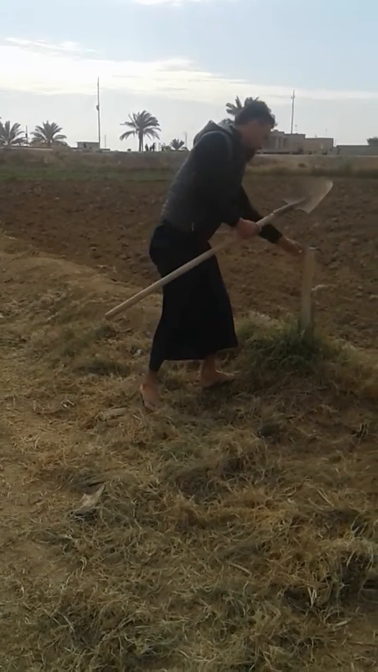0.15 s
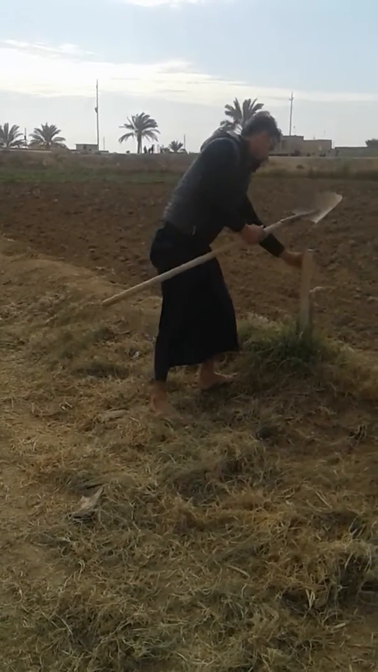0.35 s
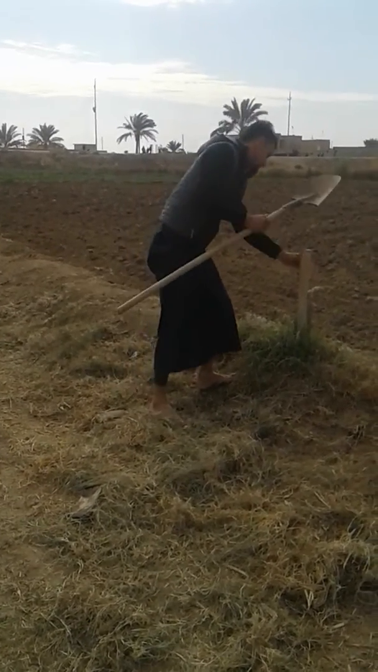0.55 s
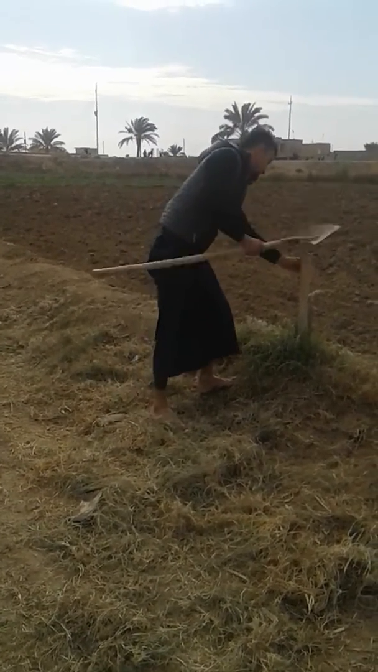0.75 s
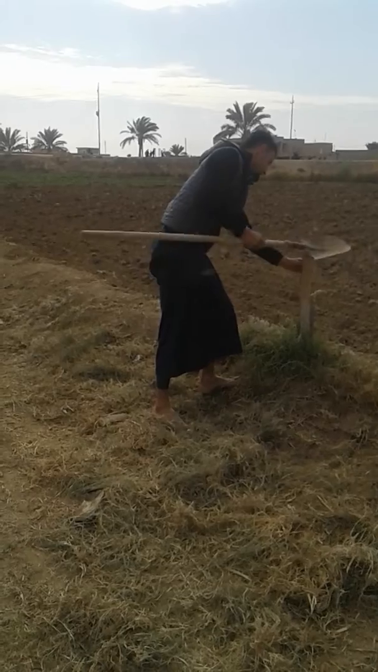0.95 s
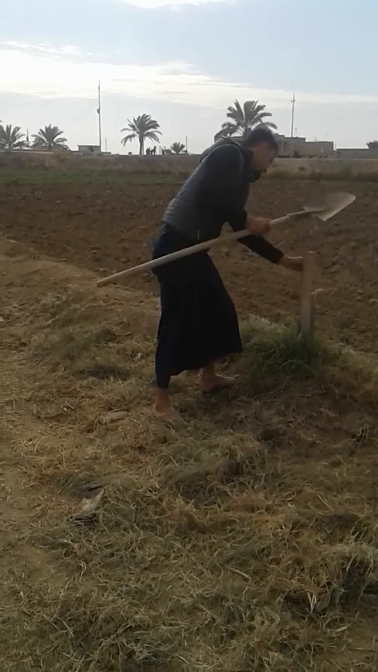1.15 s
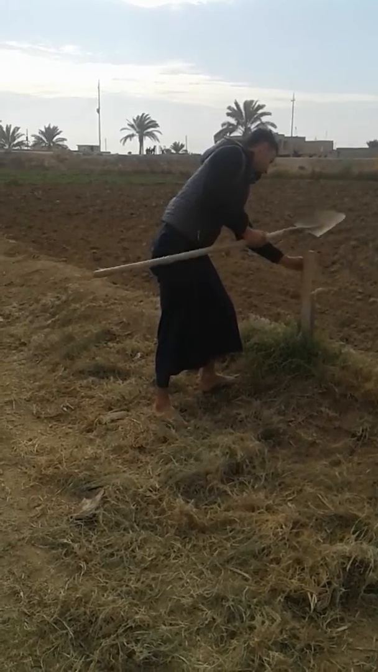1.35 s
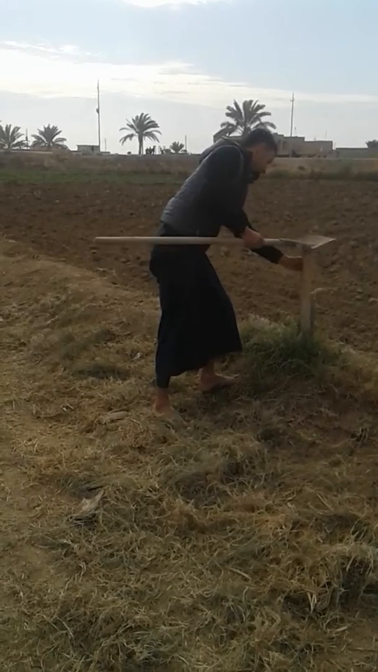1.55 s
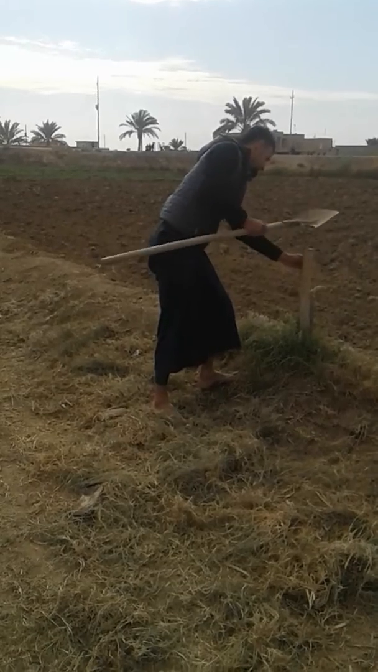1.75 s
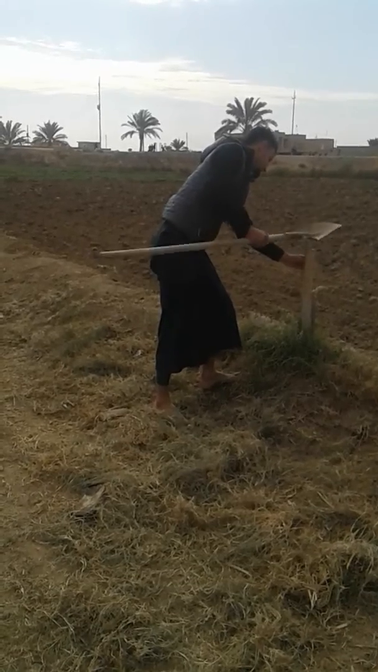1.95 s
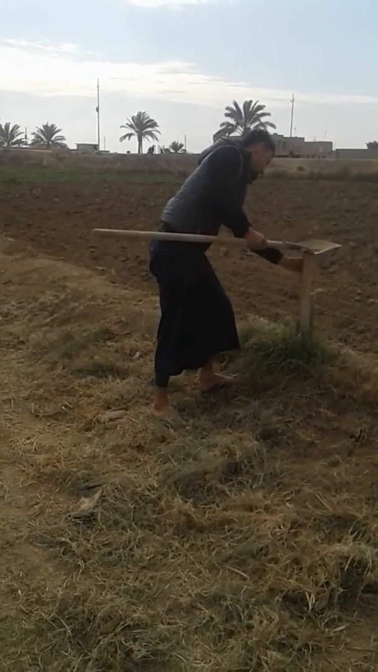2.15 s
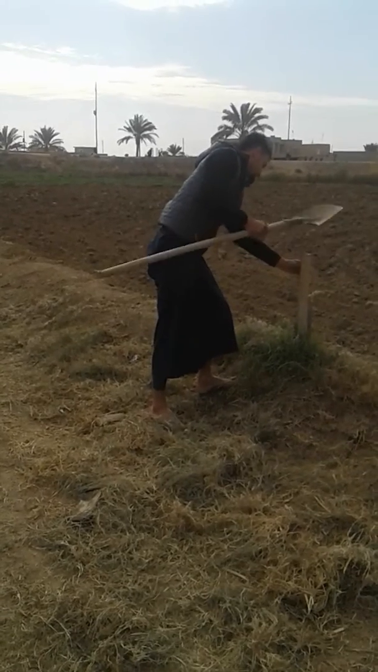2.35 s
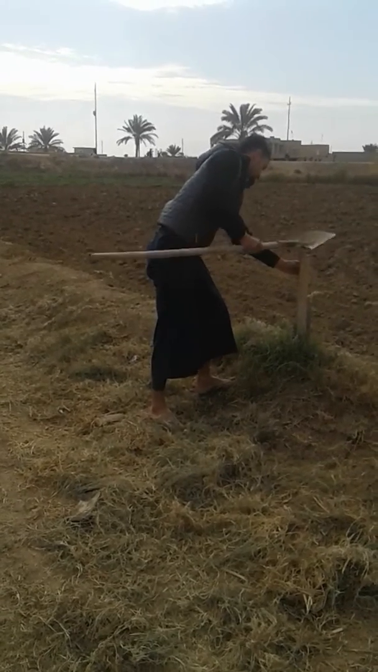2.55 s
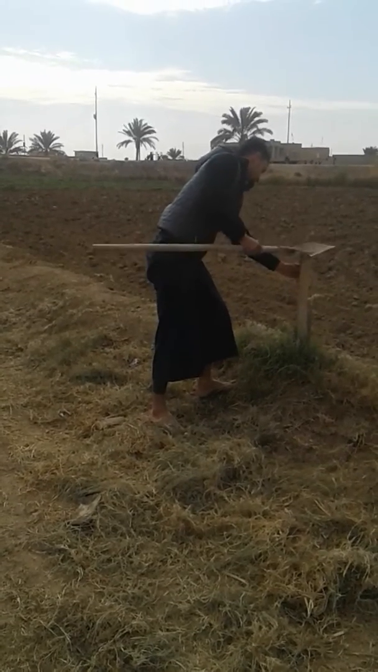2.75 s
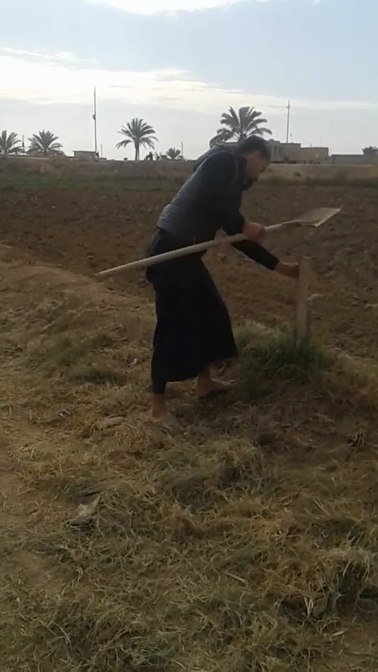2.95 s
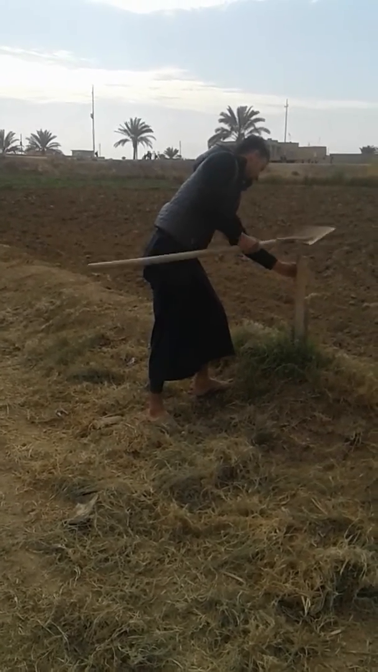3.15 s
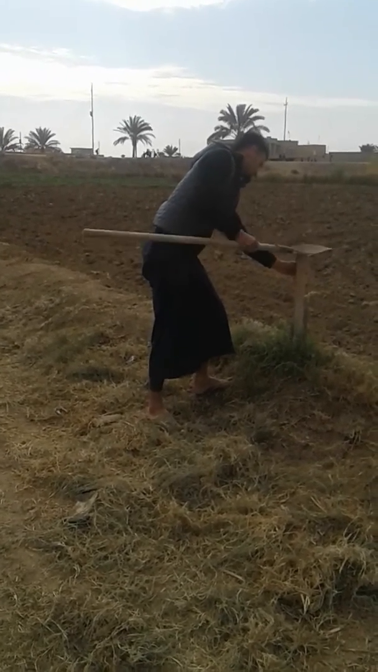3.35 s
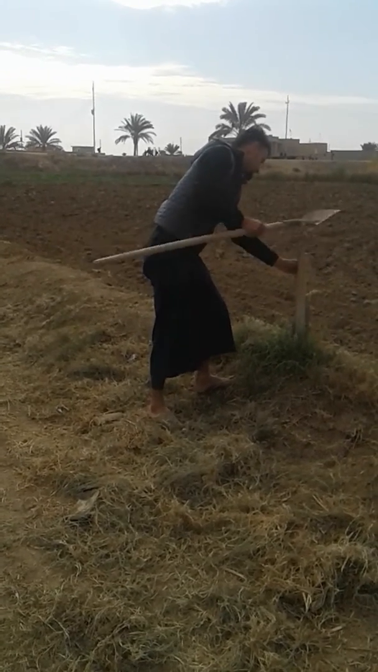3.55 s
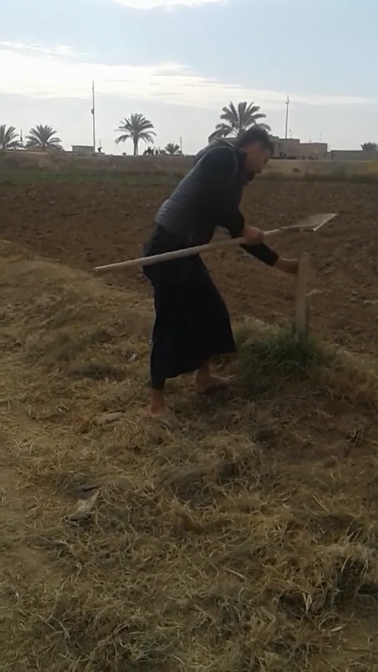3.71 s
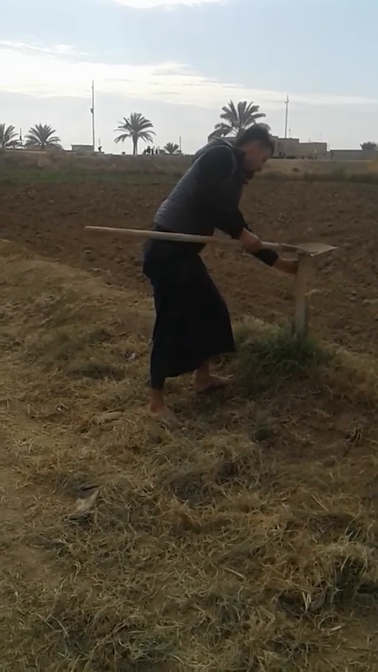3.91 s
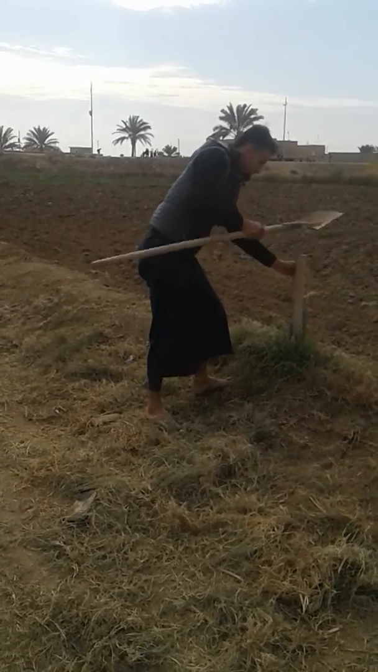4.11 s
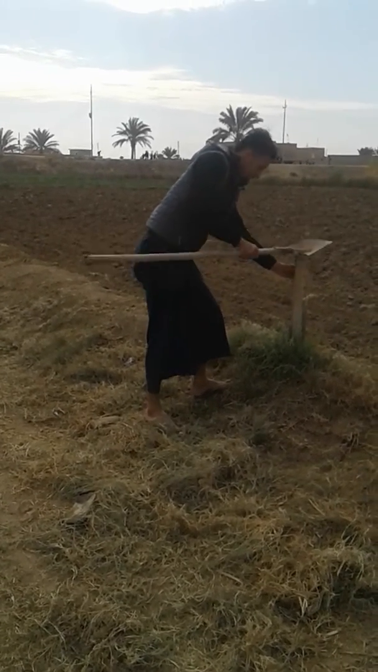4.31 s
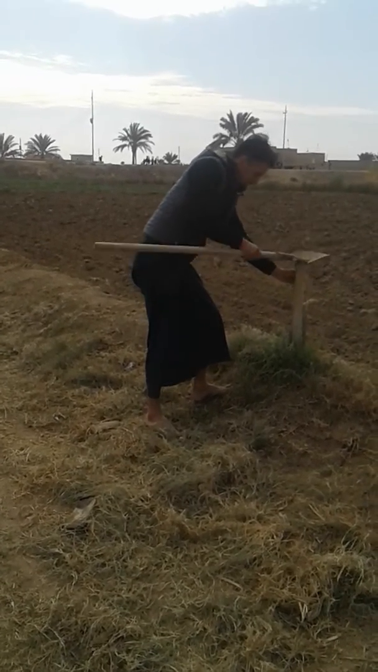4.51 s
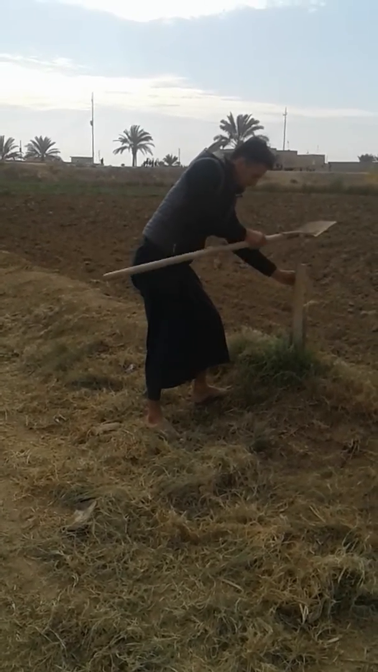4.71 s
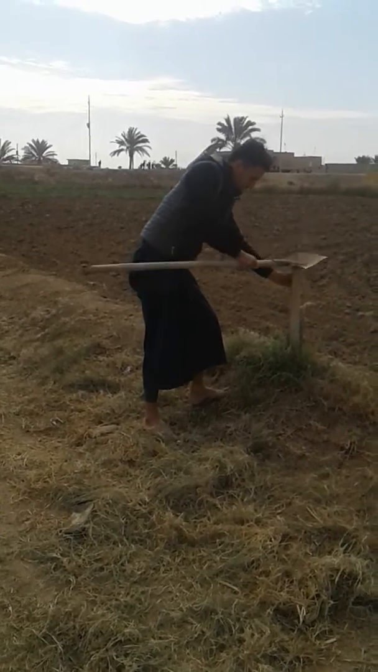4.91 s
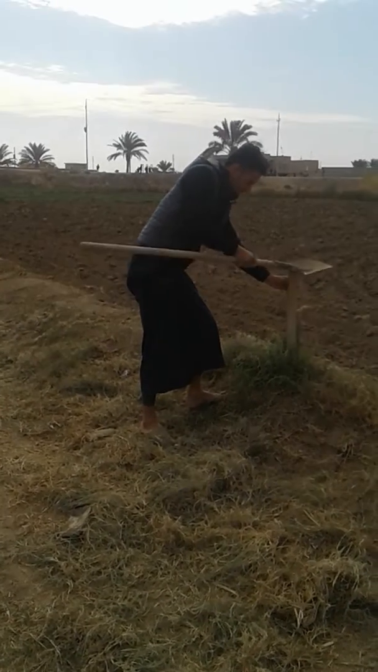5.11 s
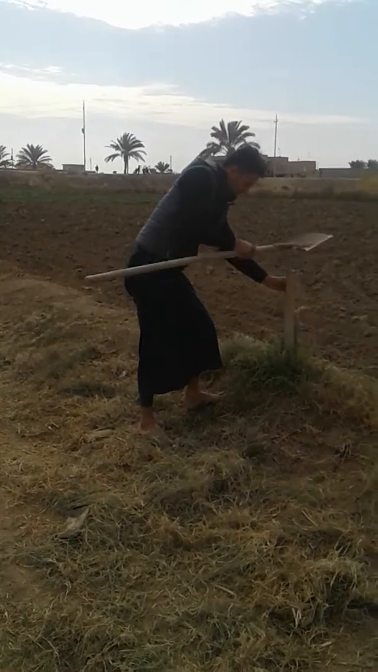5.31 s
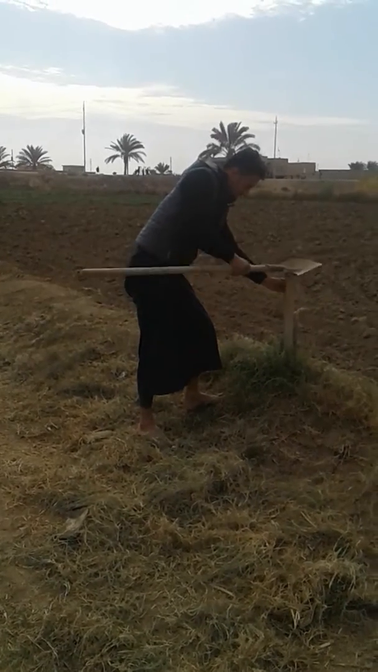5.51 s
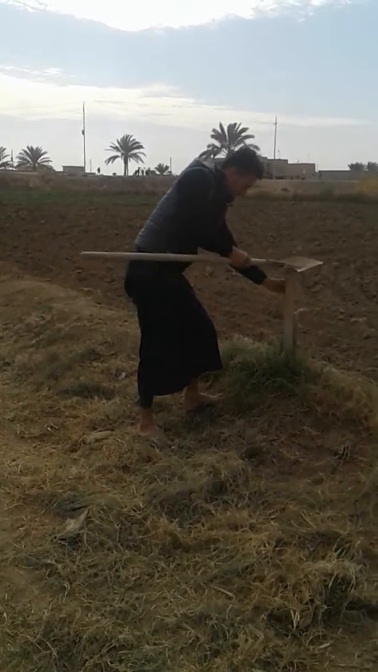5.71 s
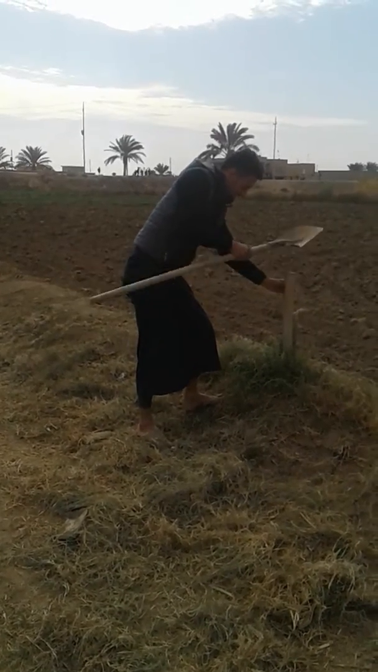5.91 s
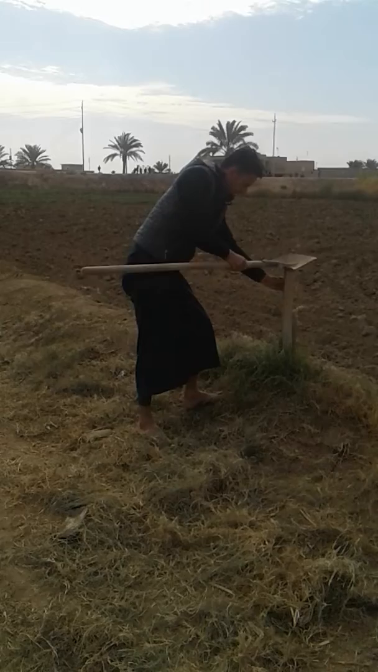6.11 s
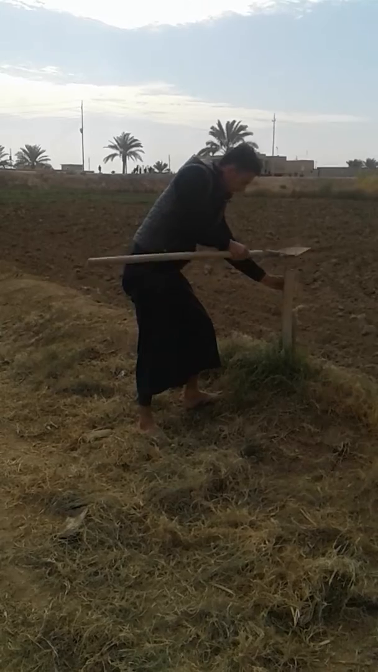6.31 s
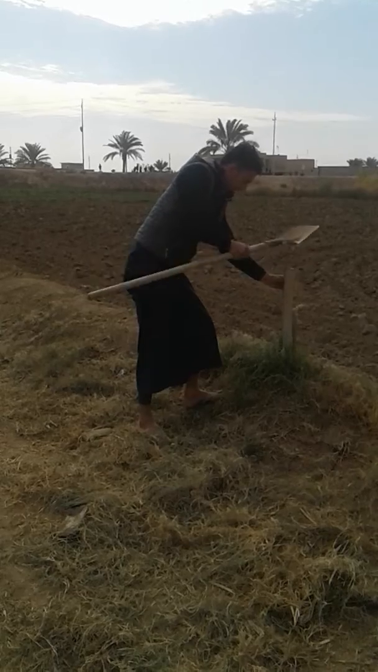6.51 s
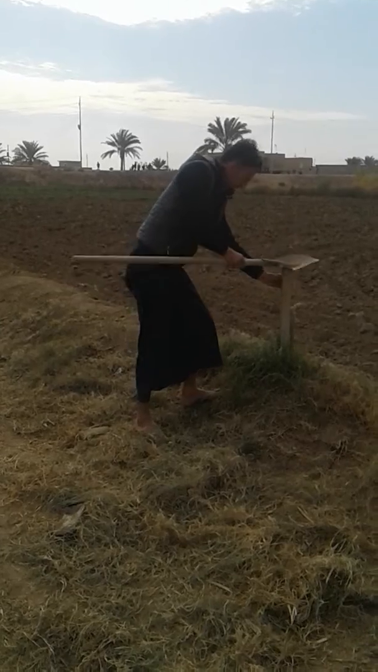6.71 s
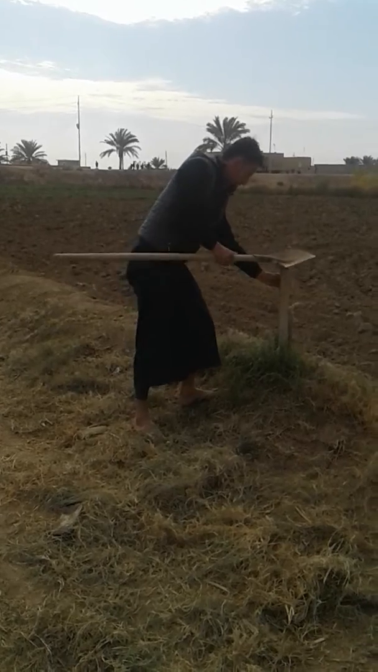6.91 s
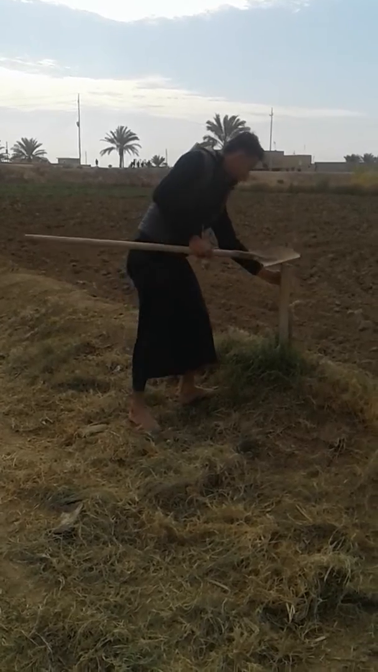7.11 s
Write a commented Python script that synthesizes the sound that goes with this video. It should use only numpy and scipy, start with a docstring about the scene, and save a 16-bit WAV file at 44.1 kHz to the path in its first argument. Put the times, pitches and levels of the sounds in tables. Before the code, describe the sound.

A brief dry foot slide in grass and light wind buffeting come first, then a shovel blade bangs a wooden post in an even beat to the end. The clanks are bright, abrupt and slightly different each time, with short clangy rings and little clattering touches between. Gusts grow heavier, rumbling and popping on the microphone. The sound is mono, close to overload at the blows, dry and open, without room echo.

```python
"""In an open, windy field, a wooden stake is driven in with the flat of a steel shovel.
Eleven blows fall in an even rhythm: each is a burst of crash noise, then the blade rings on as fading tones.
Now and then the blade drops back on the stake, with a smaller crash and a damped ring.
Gusty wind buffets the microphone as a stream of random pressure pulses, with faint gliding whistles.
Dry rustles are shaped noise: a foot slides in grass at the start, fainter rustles come later, straws snap."""
import sys
import numpy as np
from scipy import signal
from scipy.io import wavfile
from scipy.ndimage import uniform_filter1d, minimum_filter1d

SR = 44100
rng = np.random.default_rng(int(sys.argv[2]) if len(sys.argv) > 2 else 0)


def transcribe(u):
    """Save the signal u as a 16-bit wav file named by the first command-line argument.

    u: samples, shape (n,) or (channels, n), limited to [-1, 1]; the rate is SR.
    q: integer samples, one column per channel.
    """
    v = np.clip(np.atleast_2d(u).T, -1, 1)
    q = np.round(v * 32767).astype(np.int16)
    wavfile.write(sys.argv[1], SR, q)


N = 320166
TIME = np.arange(N) / SR   # seconds since the start
AGE = TIME[:SR]   # seconds since a contact or snap


def from_db(db):
    """Turn decibels into a gain."""
    return 10 ** (np.asarray(db) / 20)


def rms_one(x):
    """Scale a signal to an rms of 1."""
    return x / np.sqrt(np.mean(x ** 2) + 1e-20)


def butter(x, hz, kind, order=2):
    """Filter with a Butterworth that looks only at the past."""
    return signal.sosfilt(signal.butter(order, hz, kind, fs=SR, output="sos"), x)


def add(out, start_s, sound):
    """Mix a sound in, starting at start_s."""
    at = int(round(start_s * SR))
    out[at:at + len(sound)] += sound[:max(N - at, 0)]


def dying(t60):
    """Envelope of a dying sound: it falls 60 dB in t60 seconds."""
    return np.exp(-np.log(1000) * AGE / t60)


def ring(hz, t60):
    """One fading tone of a struck body, starting at height 1 with a random phase."""
    cycles = hz * AGE + rng.random()
    return np.sin(2 * np.pi * cycles) * dying(t60)


def drift(hz, size=N):
    """Random wandering at up to about hz times a second, with a spread near 1."""
    # made on a grid 20 times coarser; the filter's first 2000 values are thrown away
    white = rng.standard_normal(size // 20 + 4000)
    slow = rms_one(butter(white, 20 * np.clip(hz, 1, 900), "low")[2000:])
    return np.interp(np.arange(size) / 20, np.arange(len(slow)), slow)


def coloured_noise(spectrum):
    """Noise built from third-octave bands that follow a spectrum, with an rms of 1."""
    hz, db = np.transpose(spectrum)
    edges = 25 * 2 ** (np.arange(30) / 3)
    white = rng.standard_normal((2, N))   # neighbouring bands use different noise
    out = 0
    for k, (low, high) in enumerate(zip(edges, edges[1:])):
        middle = np.log(low * high) / 2
        gain = from_db(np.interp(middle, np.log(hz), db))
        out = out + gain * butter(white[k % 2], [low, high], "band")
    return rms_one(out)


def held_level(rows, attack_s, release_s):
    """Gain of events (start, length, dB) that swell, hold and fade; the strongest one wins."""
    gains = []
    for start, length, db in rows:
        before = np.minimum(TIME - start, 0)
        after = np.maximum(TIME - start - length, 0)
        gains.append(from_db(db) * np.exp(before / attack_s - after / release_s))
    return np.max(gains, axis=0)


# colour of the open field's hush: (f/Hz, level/dB per Hz, relative)
FIELD_SPECTRUM = [(30, -12), (60, -20.5), (110, 0), (250, -5), (500, -22), (1000, -15.5), (2300, -20.5),
                  (3300, -34.5), (7500, -33), (9500, -42.5), (15500, -42.5)]


def field_hush(level_db=-49):
    """The steady hush of the field: coloured noise at level_db rms."""
    return from_db(level_db) * coloured_noise(FIELD_SPECTRUM)


LUMPS_PER_S, LUMP_CEILING = 36.8, 1   # how fast the flow changes; its highest lump in standard deviations


def lumpy(depth_db, even_s=0.095):
    """Fast, uneven gain of turbulent air, evened out so its mean power stays near 1."""
    gain = from_db(depth_db * np.clip(drift(LUMPS_PER_S), -2.5, LUMP_CEILING))
    return gain / np.sqrt(uniform_filter1d(gain ** 2, size=int(even_s * SR)))


# light breeze between gusts, before its lumps: (t/s, level/dB)
BREEZE_LEVEL = [(0, -49), (.5, -36.5), (1.1, -38.5), (1.7, -33.5), (2.05, -48.5), (2.5, -26), (2.95, -38.5),
                (3.35, -36), (4.1, -40), (4.6, -35.5), (5.5, -26.5), (6.5, -21.5), (7.26, -39.5)]
# gusts, before their lumps: (start t/s, held length t/s, level/dB)
WIND_GUSTS = [(.012, 0.028, -23), (.085, 0.041, -25.5), (.57, 0.11, -31), (.745, 0.045, -26.5),
              (.89, 0.056, -30), (1.06, 0.064, -18), (1.175, 0.048, -20), (1.283, 0.048, -22.5),
              (1.52, 0.044, -36), (1.66, 0.17, -27.5), (2.1, 0.25, -22.5), (2.3, 0.18, -17),
              (2.596, .2, -16), (2.85, 0.037, -19), (3.06, 0.074, -17), (3.18, .11, -20.5),
              (3.6, 0.063, -19), (3.75, 0.11, -17.5), (4.34, 0.068, -22), (4.43, 0.093, -19.5),
              (4.72, .17, -20.5), (4.925, 0.122, -22), (5.08, .075, -23), (5.262, 0.045, -21.5),
              (5.395, .13, -21), (5.585, 0.11, -19), (5.735, 0.14, -15.5), (5.992, 0.042, -22.5),
              (6.085, 0.035, -19.5), (6.17, .29, -17.5), (6.47, .25, -17), (6.8, 0.14, -13),
              (7.03, 0.13, -16), (7.205, 0.05, -20.5)]
GUST_ATTACK_S, GUST_RELEASE_S = .008, 0.0096   # time constants of a gust's edges
# single hard thumps of wind: (t/s, level/dB)
WIND_PUFFS = [(0.114, -25), (0.277, -27), (0.344, -20), (0.494, -29.5), (0.56, -14.5), (0.732, -21),
              (0.786, -19), (0.819, -17), (0.989, -20.5), (1.078, -12), (1.289, -18.5), (1.309, -15),
              (1.427, -20.5), (1.899, -24), (2.015, -25.5), (2.374, -13.5), (2.541, -11.5), (3.165, -9),
              (3.238, -11), (3.6, -18.5), (3.623, -10.5), (4.274, -18), (4.351, -11), (4.785, -13),
              (4.93, -16), (5.205, -15), (5.575, -11), (5.676, -9.5), (5.936, -32), (6.323, -11.5),
              (6.482, -6), (7.11, -11.5), (7.225, -20)]
FLUTTER_PER_S, FLUTTER_DB = 10, 11   # chance puffs: average rate, and height above the smooth breeze


def wind_level(gust_lumps_db=5, breeze_lumps_db=2.5, puff_s=0.0035):
    """Strength of the air at the microphone: lumpy breeze, gusts and brief puffs, added as powers."""
    breeze = from_db(np.interp(TIME, *np.transpose(BREEZE_LEVEL)))
    gusts = held_level(WIND_GUSTS, GUST_ATTACK_S, GUST_RELEASE_S)
    puffs = (rng.random(N) < FLUTTER_PER_S / SR) * breeze * from_db(FLUTTER_DB)
    for s, db in WIND_PUFFS:
        add(puffs, s, [from_db(db)])
    # each puff is widened into a smooth bump of power
    bump = signal.windows.gaussian(SR // 10, puff_s * SR)
    puff_power = np.abs(signal.fftconvolve(puffs ** 2, bump, "same"))
    breeze_power = (breeze * lumpy(breeze_lumps_db)) ** 2
    gust_power = (gusts * lumpy(gust_lumps_db)) ** 2
    return np.sqrt(breeze_power + gust_power + puff_power)


def wind(eddies_per_s=600, width_s=0.00039, narrowing=0.55, size_spread_db=4,
         low_cut_hz=170, sub_cut_hz=70, top_hz=2000):
    """Eddies pass as rounded pressure pulses, narrower and so brighter the harder it blows."""
    level = wind_level()
    born = rng.random(N) < eddies_per_s / SR
    # every listed thump has an eddy at its heart
    born[[min(int(s * SR), N - 1) for s, db in WIND_PUFFS]] = True
    at = np.flatnonzero(born)
    size = from_db(size_spread_db * np.clip(rng.standard_normal(N)[at], -2, 2))
    sign = rng.choice([-1, 1], N)[at]
    # width_s belongs to an eddy whose level times size is 0.2
    width = width_s * (level[at] * size / 0.2) ** -narrowing
    lag = np.arange(-300, 301)   # samples around each eddy's centre
    shapes = np.hanning(len(lag)) / (1 + (lag / SR / width[:, None]) ** 2)
    pulses = (sign * size)[:, None] * shapes
    places = np.clip(at[:, None] + lag, 0, N)
    flow = np.bincount(places.ravel(), pulses.ravel(), N + 1)[:N]
    flow = butter(flow, low_cut_hz, "high")
    # even out the pulses' own power, so that the wind level sets the loudness
    local_power = uniform_filter1d(uniform_filter1d(flow ** 2, size=500), size=300)
    even_flow = flow / np.sqrt(np.abs(local_power) + 1e-6)
    return butter(level * even_flow, [sub_cut_hz, top_hz], "band")


# dry rustles, the first a foot sliding in grass: (start t/s, held length t/s, level/dB before the grain)
DRY_RUSTLES = [(.245, 0.24, -50.5), (2.86, 0.23, -65), (5.76, 0.1, -76), (7.16, .1, -66)]
RUSTLE_ATTACK_S, RUSTLE_RELEASE_S = .012, 0.04   # time constants of a rustle's edges
# dry straws snap: (t/s, level/dB)
STRAW_SNAPS = [(1.378, -53), (1.73, -48.5), (2.376, -52), (2.976, -49), (4.805, -51), (5.253, -47.5),
               (5.911, -49), (6.251, -48), (6.268, -56), (6.855, -42), (7.0, -57)]
# colour of the grass: (f/Hz, level/dB per Hz, relative)
GRASS_SPECTRUM = [(1500, -11.5), (3000, -6.5), (5000, -3.5), (6000, 4.5), (9500, -1), (12000, -26),
                  (15500, -5)]


def grass(grain_db=1.5, snap_t60=0.028):
    """Dry stalks rustle as grainy noise, and single straws snap as short bursts."""
    grain = from_db(grain_db * rms_one(butter(rng.standard_normal(N), 150, "low")))
    level = held_level(DRY_RUSTLES, RUSTLE_ATTACK_S, RUSTLE_RELEASE_S) * grain
    for s, db in STRAW_SNAPS:
        add(level, s, from_db(db) * dying(snap_t60))
    return level * coloured_noise(GRASS_SPECTRUM)


# thin whistles in the wind: (start t/s, end t/s, start f/Hz, end f/Hz, peak level/dB)
WIND_WHISTLES = [(.36, 0.456, 1500, 1170, -60), (.4, .9, 2330, 2270, -61), (1.17, 1.532, 1110, 1106, -53),
                 (1.27, 1.484, 2790, 2840, -65), (1.9, 2.016, 1600, 1200, -51),
                 (1.94, 2.115, 2070, 2290, -55)]


def whistles():
    """Faint gliding tones that fade in and out, their pitch wavering slightly."""
    out = np.zeros(N)
    for start, end, first_hz, last_hz, db in WIND_WHISTLES:
        size = int((end - start) * SR)
        glide = np.linspace(first_hz, last_hz, size)
        pitch = glide * (1 + 0.0085 * drift(15, size=size))
        tone = np.sin(2 * np.pi * np.cumsum(pitch) / SR)
        add(out, start, from_db(db) * np.hanning(size) * tone)
    return out


# main tones (modes) of the blade:
# (f/Hz, t60 t/s, level/dB for a central blow, level/dB gained per unit along, same per unit across)
MAIN_BLADE_MODES = [(1237, 0.37, -22.5, 0.8, 7.5), (1425.5, 0.48, -16, 0, 5.5),
                    (1487.6, 0.3, -13.5, -2.5, 3.5), (1613, 0.32, -22, 12, 6.5),
                    (1826, 0.95, -25.5, 2.5, 4.5), (2165.2, 0.44, -8, -2.6, -5.5),
                    (2279, 0.38, -18.5, -2.4, -1.7)]
SWAY_HZ = 20   # how fast the main tones waver


def main_ring(ring_db, along, across, sway_db):
    """Where the blade lands decides which modes speak; their levels waver as they ring."""
    out = 0
    for hz, t60, db, along_db, across_db in MAIN_BLADE_MODES:
        landing_db = along * along_db + across * across_db
        level_db = ring_db + db + landing_db + sway_db * drift(SWAY_HZ, size=SR)
        out = out + from_db(level_db) * ring(hz, t60)
    return out


# minor modes of the blade: (f/Hz, average level/dB, relative, t60 t/s)
MINOR_BLADE_MODES = [(1095, -8, 0.23), (1566, 6.5, 0.14), (1912, 1, 0.078), (2427, -1.5, .15),
                     (2606, -4.5, 0.46), (2860, -2.5, 0.23), (3260, -9.5, 0.3), (3396, -12.5, 0.24),
                     (3610, -12, 0.32), (3832, -4, 0.19), (4700, -11, 0.23), (5110, -24, 0.047),
                     (6090, -16, .09), (5780, -11, 0.16), (6170, -17, 0.045), (7100, -19.5, 0.079),
                     (7340, -8, 0.14), (7900, -18.5, 0.27)]


def minor_ring(spread_db):
    """The minor modes, struck with new random strengths each time."""
    out = 0
    for hz, db, t60 in MINOR_BLADE_MODES:
        strength_db = db + spread_db * rng.standard_normal()
        out = out + from_db(strength_db) * ring(hz, t60)
    return out


# outline of the blade's crowd of high modes: (f/Hz, level/dB, relative, typical t60 t/s)
SHIMMER_OUTLINE = [(2902, -43.5, 0.15), (3780, -36, 0.089), (5200, -36.5, 0.11), (5840, -26, 0.087),
                   (7950, -28, 0.064), (8500, -48.5, 0.051), (11350, -40, 0.059), (15030, -50.5, .05)]


def shimmer_modes(count):
    """Closely spaced high modes, one per row, made once for all contacts."""
    hz, db, t60 = np.transpose(SHIMMER_OUTLINE)
    places = (np.arange(count) + rng.random(count)) / count
    pitches = hz[0] + (hz[-1] - hz[0]) * places ** 1.3   # packed closer at the low end
    lives = np.interp(pitches, hz, t60) * np.exp(0.067 * rng.standard_normal(count))
    return np.array([from_db(np.interp(f, hz, db)) * ring(f, life) for f, life in zip(pitches, lives)])


def struck_shimmer(high_modes, level_db):
    """One strike of the high modes, each with a random strength and sign."""
    return from_db(level_db) * rng.standard_normal(len(high_modes)) @ high_modes


# blows: (t/s, main ring level/dB, minor modes level/dB,
#         landing spot along and across the blade, in units of about -1 to 1)
SHOVEL_BLOWS = [(0.909, -1, -22, 1, -0.47), (1.521, -3, -44.5, -1, 0.42), (2.098, -1.5, -23, 0.12, 0.43),
                (2.683, 4, -24.5, 0.043, -0.36), (3.291, 1.5, -21, -1.4, 0.16),
                (3.88, -0.8, -21.5, -0.85, 1), (4.459, 5.5, -21, 0.55, -0.24), (5.038, 6, -22, 0.042, 0.24),
                (5.615, -4.5, -21, .98, 0.11), (6.173, -3.5, -30.5, 0.23, 1),
                (6.716, -0.7, -26, -0.35, 0.31)]
# the blade touches the stake again: (t/s, level/dB added to the touch settings)
STAKE_TOUCHES = [(0.925, -14), (0.976, -26), (1.014, -32), (1.536, -8), (2.157, -19), (2.182, -33.5),
                 (2.697, -10.5), (3.398, -16), (3.934, -13.5), (3.991, -25), (4.501, -14.5), (5.117, -12.5),
                 (5.16, -38), (5.692, -27), (6.267, -31), (6.299, -27.5), (6.771, -17), (6.811, -27.5)]
# crash of steel on wood: (f/Hz, level/dB per Hz, relative)
CRASH_SPECTRUM = [(100, -12.5), (400, -3), (750, 2), (1100, 6.5), (1450, 9), (2200, 5), (3200, -9),
                  (5100, -5.5), (6100, -11.5), (7600, -2.5), (8600, -6), (10300, -17), (12200, -24),
                  (15800, -49.5)]
# the duller clatter that follows it: (f/Hz, level/dB per Hz, relative)
CLATTER_SPECTRUM = [(100, -2.5), (500, 5), (1000, 5.5), (1500, -4), (2300, 5), (3100, -3.5), (3800, 2),
                    (4900, -17), (6100, -2), (7600, -16), (8800, -19), (10500, -20.5), (12400, -33),
                    (15800, -34.5)]
CRASH_S = .014   # how long the steel grinds on the wood
# the first instant of a blow is the hardest and brightest
CRACK_DB, CRACK_T60_S, CRACK_BAND_HZ = -12.5, .03, (3000, 12000)
MINOR_SPREAD_DB = 4   # how much the minor modes differ from blow to blow
RESTING_T60_S = .6   # extra damping when the blade drops back on the wood


def shovel(crash_db=-7, crash_shape=2.2, tail_db=-19, tail_t60=0.14, scatter_db=-45, scatter_t60=0.92,
           swell_s=0.0081, sway_db=1.5, shimmer_db=3.5, touch_shimmer_db=-1, touch_ring_db=-15,
           touch_crash_db=-13, touch_t60=0.081, touch_tail_db=-17, bite_s=0.0022):
    """Each contact is a short crash; after a blow the main modes swell over several milliseconds, then fade."""
    out, contact, echo = np.zeros(N), np.zeros(N), np.zeros(N)
    high_modes = shimmer_modes(count=220)
    swell = 1 - np.exp(-AGE / swell_s)
    bite = 1 - np.exp(-AGE / bite_s)   # the quick onset of a contact
    for s, ring_db, minor_db, along, across in SHOVEL_BLOWS:
        main = main_ring(ring_db, along, across, sway_db)
        minor = from_db(minor_db) * minor_ring(MINOR_SPREAD_DB)
        shimmer = struck_shimmer(high_modes, shimmer_db)
        add(out, s, swell * main + bite * (minor + shimmer))
        add(contact, s, from_db(crash_db) * bite * np.exp(-(AGE / CRASH_S) ** crash_shape))
        crack = butter(rng.standard_normal(SR), CRACK_BAND_HZ, "band")
        add(out, s, from_db(CRACK_DB) * dying(CRACK_T60_S) * crack)
        # the clatter dies away, and the rough ground scatters a faint tail back
        tail = from_db(tail_db) * dying(tail_t60)
        scatter = from_db(scatter_db) * dying(scatter_t60)
        add(echo, s, bite * (tail + scatter))
    for s, db in STAKE_TOUCHES:
        shimmer = struck_shimmer(high_modes, touch_shimmer_db)
        minor = from_db(touch_ring_db) * minor_ring(spread_db=4.5)
        add(out, s, from_db(db) * bite * dying(RESTING_T60_S) * (shimmer + minor))
        add(contact, s, from_db(db + touch_crash_db) * bite * dying(touch_t60))
        add(echo, s, from_db(db + touch_tail_db) * bite * dying(tail_t60))
    crash = contact * coloured_noise(CRASH_SPECTRUM)
    clatter = echo * coloured_noise(CLATTER_SPECTRUM)
    # steel chatters on the wood, so the crash is uneven
    chatter = from_db(2.9 * drift(240))
    return out + (crash + clatter) * chatter


def scene():
    """Wind, grass and shovel over the hush of the open field, in one channel."""
    return (field_hush() + wind() + grass() + whistles() + shovel())[None]


CUTOFF_HZ = 16000   # the treble above this is cut


def record(dry):
    """A very fast limiter holds the blows under full scale, then the top is cut."""
    ceiling_db, release_db_per_s = -.6, 2000
    over = np.maximum(20 * np.log10(np.abs(dry[0]) + 1e-9) - ceiling_db, 0)
    # the reduction jumps up with each peak and then falls at the release speed
    released = release_db_per_s * TIME
    held = np.maximum.accumulate(over + released) - released
    # start turning down a few samples early, and smooth the change
    gain = uniform_filter1d(minimum_filter1d(from_db(-held), size=21), size=21)
    top_cut = signal.ellip(10, .3, 70, CUTOFF_HZ, fs=SR, output="sos")
    return signal.sosfilt(top_cut, dry * gain)


dry = scene()
out = record(dry)
transcribe(out)
```